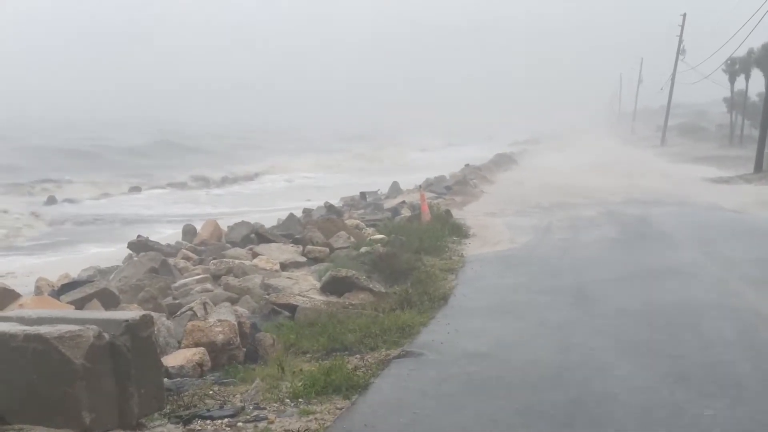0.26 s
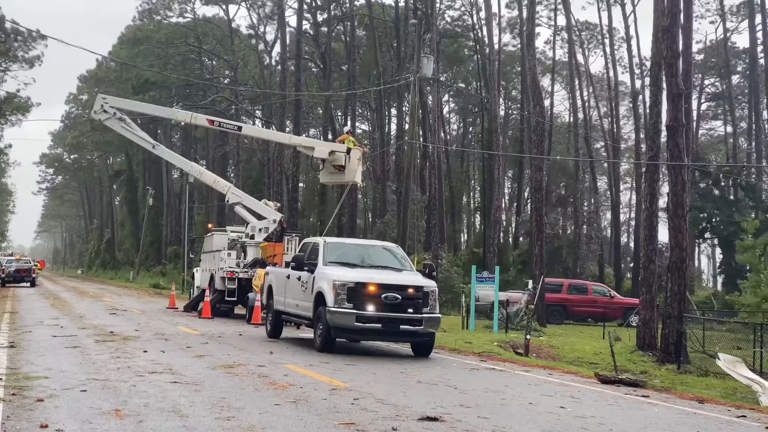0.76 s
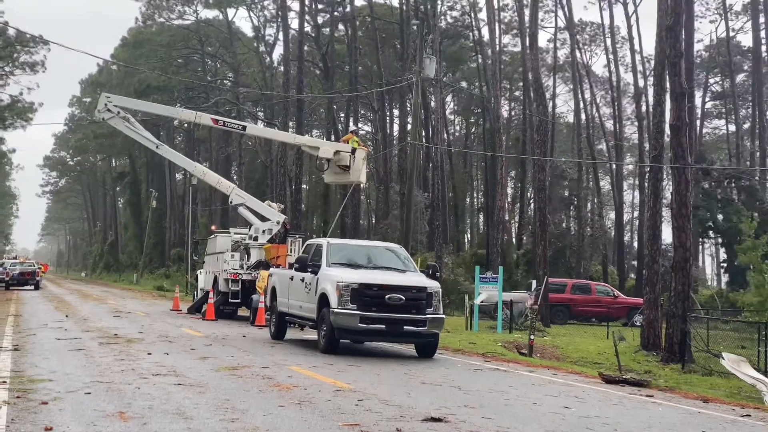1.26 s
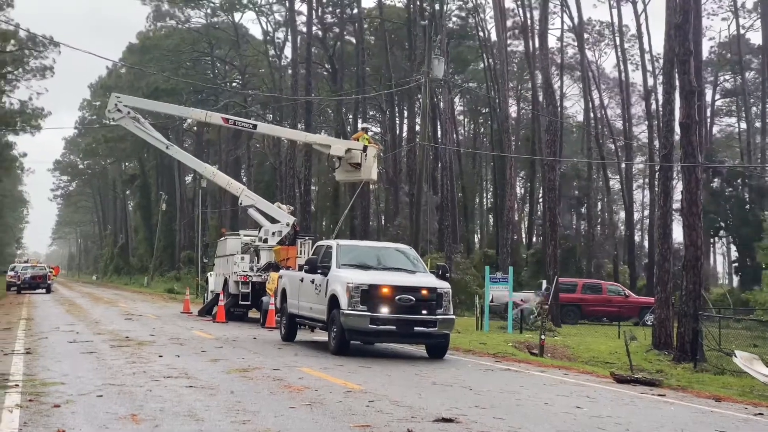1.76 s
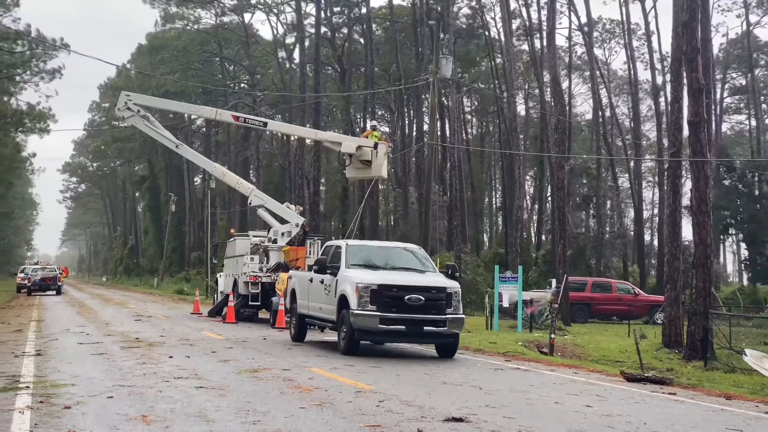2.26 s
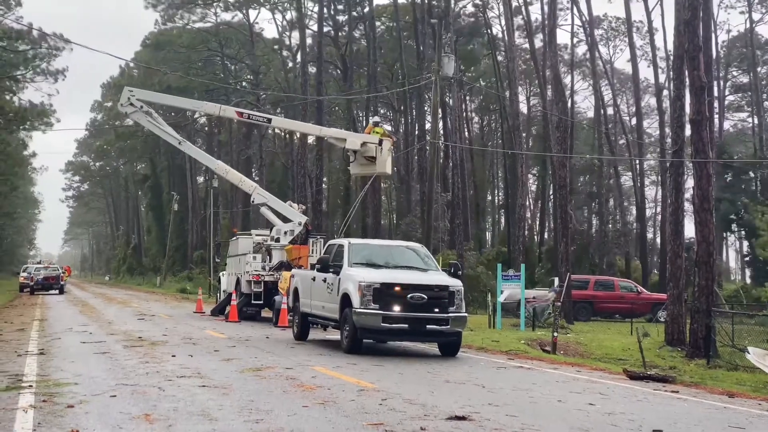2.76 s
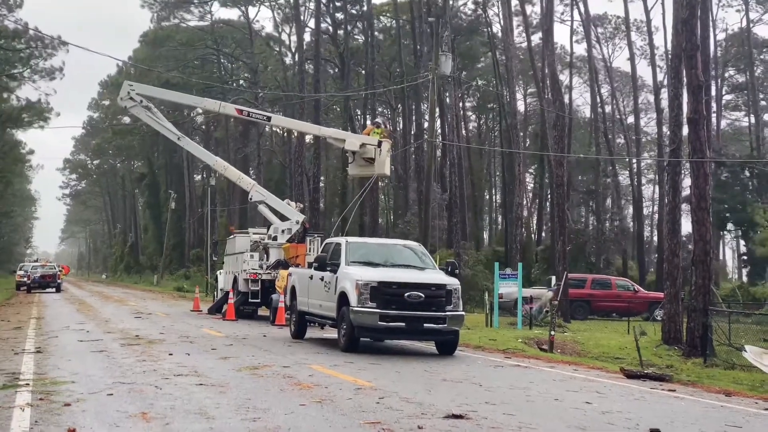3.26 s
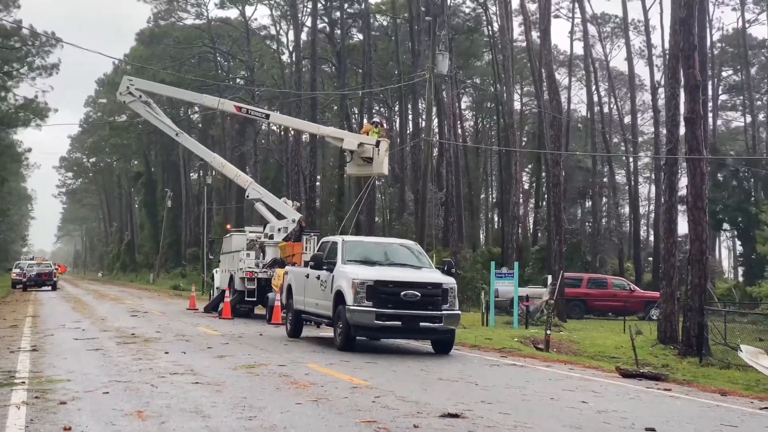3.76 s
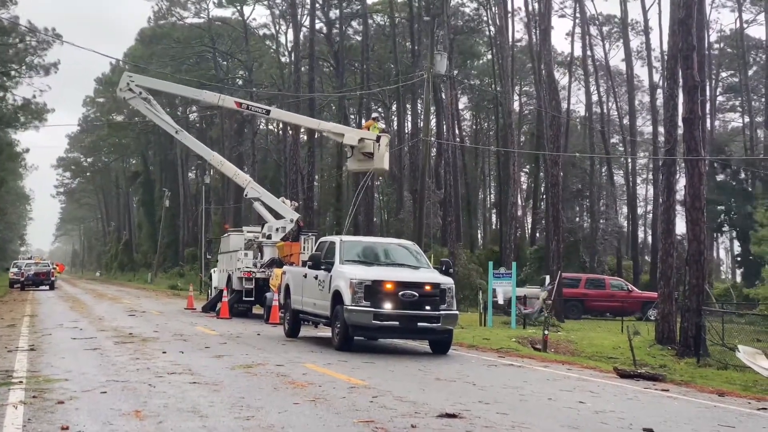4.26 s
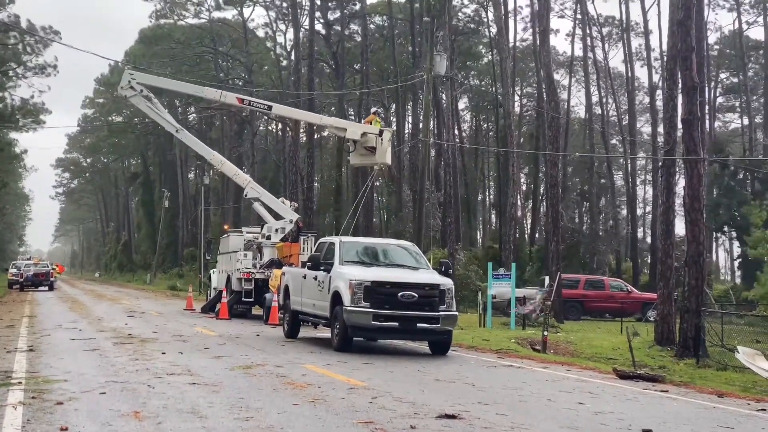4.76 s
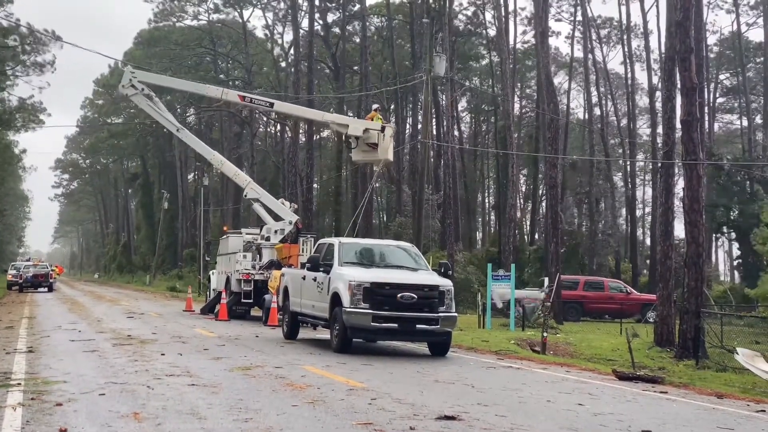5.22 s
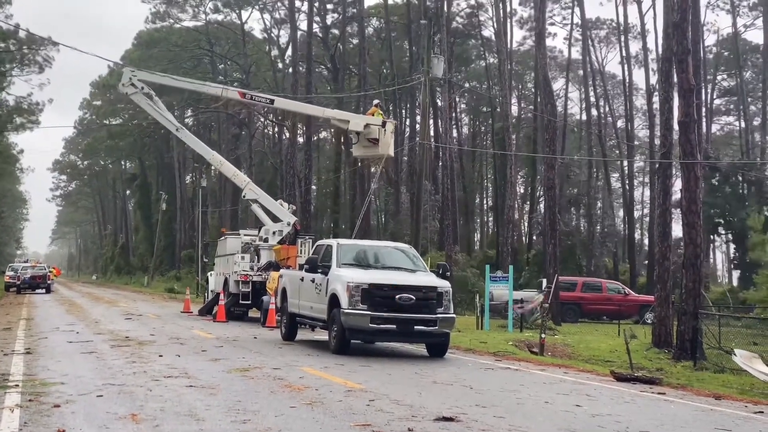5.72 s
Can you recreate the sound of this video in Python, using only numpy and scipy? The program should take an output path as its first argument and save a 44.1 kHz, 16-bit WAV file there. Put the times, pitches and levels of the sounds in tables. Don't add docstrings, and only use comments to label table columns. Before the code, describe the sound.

The sound opens on stormy surf at a rocky shore: a wide, bright hiss over a faint lumpy rumble, with tiny spray slaps and soft far thuds. It fades to silence at about 0.34 seconds and quickly swells back as wind in tall pines. A steady, airy needle hiss lasts to the end, with a mid-range sough gently rising and falling and a lower branch roar. From 0.4 to 1.05 seconds gusts buffet the microphone, with the strongest low, soft thump near 0.83. The wind then stays fairly even, with sparse ticks around 2 to 2.5 seconds. Between 3.3 and 3.9 a faint, fuzzy wire moan swells amid mild buffeting. Dull low knocks come at 4.32 and, more strongly, at 4.5, surrounded by small dry ticks until just after 5 seconds. One last tick falls near 5.37, and plain hiss continues. Open outdoors, close stereo microphone, with thinned bass.

```python
import sys
import numpy as np
from scipy import signal
from scipy.io import wavfile
from scipy.ndimage import uniform_filter1d

SR = 44100
rng = np.random.default_rng(int(sys.argv[2]) if len(sys.argv) > 2 else 0)


def persist_wave(psi):
    counts = np.round(np.clip(psi, -1, 1) * 32767).astype(np.int16)
    wavfile.write(sys.argv[1], SR, np.atleast_2d(counts).T)


def amplitude_ratio(level_db):
    exponent = np.asarray(level_db, float) / 20
    return 10 ** exponent


N = 264047

# frequency in Hz, density in dB per Hz.
SURF_SPECTRUM = [(150, -11), (300, -10), (500, -4), (1000, -7.5), (2000, -3), (4000, -9.5), (6500, -11.5),
                 (9000, -8.5), (12000, -7), (14000, -8), (15600, -2)]
# frequency in Hz, density in dB per Hz.
RUMBLE_SPECTRUM = [(20, -16), (45, -5), (68, -6), (95, -6), (140, -4.5), (250, -7.5), (500, -29)]
# time in seconds, swell in dB.
SWELL = [
    (0.0, 3.5),
    (0.02, 0.5),
    (0.026, 3.5),
    (0.045, 0),
    (0.262, 0.7),
    (0.276, 5.5),
    (0.292, -2),
]
SURF_DB, RUMBLE_DB = -34, -52.5
RUMBLE_FOLLOWS = 2.2
# start in seconds, peak in dB, pitch in Hz, burst length in seconds.
TICKS = [(0.014, -25, 3050, 0.006), (.215, -32, 10000, 0.0015), (0.273, -27.5, 1446, 0.011),
         (0.809, -26, 795, 0.018), (0.666, -29.5, 700, 0.01), (1.992, -25, 1000, .006),
         (2.363, -27, 800, 0.0071), (2.483, -29, 1000, 0.0061), (5.365, -26.5, 1000, .007),
         (0.535, -22.5, 586, 0.0052), (1.923, -23.5, 1000, 0.007), (3.826, -34.5, 800, 0.0047),
         (3.863, -37, 695, 0.0054), (4.195, -30, 1200, 0.0061), (4.436, -28, 1100, 0.01),
         (4.4685, -24, 1100, 0.0028), (4.472, -21.5, 700, 0.012), (2.054, -26.5, 800, 0.007),
         (1.08, -28, 650, .012), (4.499, -23, 900, 0.0083), (4.793, -22, 1380, 0.019),
         (4.823, -25, 1490, 0.0056), (4.938, -23.5, 900, 0.012), (4.958, -24, 1010, 0.0072),
         (5.036, -22.5, 1090, 0.0044)]
# middle in seconds, peak in dB, frequency in Hz, length in seconds.
THUDS = [
    (0.017, -44, 80, 0.042),
    (0.095, -46, 75, .04),
    (0.289, -44, 85, .032),
]

CUT_S, FADE_OUT_S, FADE_IN_S, FADE_BEND = 0.338, 0.058, 0.07, 1.75

# time in seconds, strength in dB.
WIND = [(.42, -38), (.9, -37.5), (1.2, -38), (1.55, -39.5), (1.65, -38), (1.78, -41), (2.15, -36.5),
        (2.35, -39.5), (2.55, -38), (2.9, -40), (3.5, -41), (3.9, -39), (4.25, -41), (4.5, -37.5),
        (5.02, -37), (5.2, -38), (5.7, -40), (5.98, -39)]
CALM_DB = -39.5
# frequency in Hz, density in dB per Hz.
NEEDLE_SPECTRUM = [(1200, -23), (2400, -10), (3000, -5.5), (4000, -8), (6000, -10), (7500, -13), (8300, -6),
                   (10000, -11.5), (12000, -15), (13500, -18.5), (15000, -15.5), (15700, -18)]
# frequency in Hz, density in dB per Hz.
SOUGH_SPECTRUM = [(800, -18.5), (1300, -3.5), (1600, -3.5), (1800, -1.5), (2000, -1.5), (2300, -4.5),
                  (2700, -6.5), (3300, -20)]
# frequency in Hz, density in dB per Hz.
ROAR_SPECTRUM = [(250, -15), (450, -3.5), (600, -1), (740, 0.5), (900, 0), (1100, -1.5), (1400, -14),
                 (2200, -28)]
# frequency in Hz, density in dB per Hz.
BUFFET_SPECTRUM = [(60, -18), (150, -4.5), (280, 1), (450, 0), (700, -9.5), (1300, -38.5)]
NEEDLES_DB, SOUGH_DB, ROAR_DB = -37, -38.5, -42
STILL_DB = -63.5
NEEDLES_FOLLOW, SOUGH_FOLLOWS, ROAR_FOLLOWS = 0.1, 1.04, 0.081
# middle in seconds, buffeting in dB, length in seconds, lift of the branch roar in dB.
EDDIES = [(0.436, -36.5, 0.26, 4.5), (0.674, -49, 0.11, 1.3), (0.755, -38, 0.037, 2.5),
          (0.833, -24, 0.088, 5), (0.962, -34, 0.2, 4), (1.395, -50.5, 0.59, 0.1), (1.66, -56, 0.12, 2.2),
          (1.792, -70, 0.019, -10), (1.812, -46, 0.047, 5), (1.888, -60, 0.027, 9), (1.98, -65, .06, -2),
          (2.15, -61, .25, -2.5), (2.324, -54, 0.042, 1.5), (2.407, -64, 0.038, -4),
          (2.61, -71, 0.066, -6.5), (2.765, -50, 0.28, 0.5), (3.2, -62, 0.45, 1.3), (3.505, -40, 0.28, 0.5),
          (3.815, -38.5, 0.34, .3), (3.965, -57, 0.17, 3), (4.294, -38.5, 0.34, 1.5),
          (4.45, -31, 0.077, -2), (4.508, -36.5, 0.046, -4), (4.58, -60, 0.04, -5),
          (4.659, -40.5, 0.12, -3.5), (4.825, -55, 0.087, 5.5), (4.92, -70, .05, -0.5),
          (4.945, -59, 0.014, 2), (5.12, -70, 0.66, -4), (5.75, -51, 0.086, 2.5)]
EDDY_RISE, EDDY_FALL = 0.51, 0.59
# middle in seconds, peak in dB, frequency in Hz, length in seconds.
LUMPS = [(.418, -30.5, 228, 0.014), (.458, -29, 276, 0.029), (.491, -36, 450, 0.015),
         (.668, -42.5, 206, 0.037), (.752, -30.5, 414, 0.034), (.826, -20, 460, 0.021),
         (.836, -27, 262, .032), (.855, -26, 282, .026), (.884, -25, 295, 0.023), (.917, -44, 426, .016),
         (.96, -26.5, 324, 0.025), (.993, -30, 390, 0.018), (1.036, -28.5, 550, .02),
         (4.445, -25, 428, .0092), (4.448, -24, 428, 0.034)]
LUMP_PAN_DB, LUMP_LAG = -0.5, 0.045
# middle in seconds, peak in dB, frequency in Hz, length in seconds.
KNOCKS = [(1.74, -79, 120, .05), (1.97, -76, 330, .12), (1.822, -55, 200, 0.023), (1.835, -49, 55, 0.042),
          (1.878, -62, 200, 0.024), (1.882, -55, 50, .07), (4.324, -30, 167, 0.034), (4.352, -50, 175, 0.1),
          (4.499, -19, 143, .041), (4.5, -20, 295, 0.024), (4.535, -56, 159, .06), (4.803, -62, 209, 0.029),
          (4.845, -52, 82.5, .04), (4.92, -66, 65, .07), (4.975, -78, 100, .04), (5.06, -83, 70, .07),
          (4.82, -74, 320, 0.074)]
KNOCK_PAN_DB, KNOCK_LAG = 1.1, 0.25
# time in seconds, level in dB.
MOAN = [
    (2.9, -80),
    (3.25, -56),
    (3.4, -45),
    (3.6, -50),
    (3.7, -45),
    (3.87, -40.5),
    (3.95, -62),
    (4.2, -80),
]
MOAN_HZ, MOAN_WIDTH_HZ = 735, 79

# frequency in Hz, lead of the left port in radians, likeness of the ports
PORTS = [(60, 0, .6, 1), (150, .05, .6, 1), (340, .4, .93, .9), (700, 0, .93, .45), (1290, -.6, .87, .3),
         (1700, -.05, .96, .35), (3300, 0, .9, .4), (4200, 0, .8, .8), (7450, -.1, .72, .72),
         (7600, -1.4, .98, .95), (8500, -3.14, .98, .95), (10050, -6.28, .97, .9), (12050, -9.42, .97, .96),
         (13900, -12.57, .97, .9), (15700, -15.7, .97, .9)]
HZ = np.fft.rfftfreq(1024, 1 / SR)
LOOSE_ABOVE_HZ, TIED = 8900, 0.6
# start in seconds, length in seconds, edge in Hz at the start,
# edge in Hz at the end.
OPENINGS = [(0.341, 0.04, 230, 200), (0.388, .178, 108, 107), (.563, 0.1, 200, 188),
            (.658, 0.055, 140, 200), (0.708, 0.096, 258, 246), (0.811, 0.22, 171, 170),
            (1.065, 0.3, 297, 314), (1.325, .32, 246, 224), (1.647, 0.094, 263, 404),
            (1.779, 0.11, 358, 368), (2.046, .077, 120, 122), (2.121, .17, 228, 270),
            (2.293, .47, 318, 354), (2.764, 0.36, 132, 310), (3.036, 0.32, 384, 390),
            (3.273, 0.034, 340, 280), (3.321, 0.24, 189, 165), (3.565, 0.31, 207, 129),
            (3.909, 0.32, 257, 256), (4.25, 0.044, 226, 200), (4.298, 0.2, 317, 348),
            (4.478, 0.23, 240, 284), (4.694, 0.063, 280, 330), (4.86, 0.82, 410, 375),
            (5.718, 0.05, 380, 283), (5.79, 0.11, 282, 258)]
SHUT_HZ = 450
# middle in seconds, length in seconds, depth in dB.
HOLLOWS = [
    (1.97, .14, -5.5),
    (2.46, .2, -5.5),
    (2.215, .06, -3),
    (4.6, .16, -3.5),
    (4.9, .08, -2),
    (5.87, .1, -2.5),
]
HOLLOW_HZ = 700
# frequency in Hz, level against the difference in dB.
DROP_SUM = [(7000, -30), (8600, -14), (11400, -8), (12000, -10.5), (12700, -6.5), (14800, -6),
            (15500, -3.5)]
# frequency in Hz, level against the sum in dB.
DROP_DIFFERENCE = [(1500, -20), (2000, -9), (4000, -4.8), (7200, -3), (7900, -9), (10000, -7), (10700, -6),
                   (13400, -4.5), (14800, -4), (15500, -9)]
BANDS = np.r_[0:1025:16]
WAVER_DB, TOP_HZ = 1.5, 15740


def evened(x):
    return x / np.sqrt(np.mean(abs(x) ** 2) + 1e-20)


def smooth_twice(x, size):
    return uniform_filter1d(uniform_filter1d(x, size=size), size=size)


def read(points, hz):
    f, value = np.transpose(points)
    return np.interp(np.log(hz + 1), np.log(f + 1), value)


def curves(table, t):
    s, *columns = np.transpose(table)
    return [np.interp(t, s, c) for c in columns]


def add(mix, s, sound):
    part = mix[:, max(round(s * SR), 0):][:, :sound.shape[1]]
    part += sound[:, :part.shape[1]]


def air_noise(spectrum, ashore, patchy_db, flicker_db, size=N):
    frames = size // 256 + 5
    *parts, patches = rng.standard_normal((7, len(HZ), frames), np.float32)
    common, separate, loose = (parts[k] + 1j * parts[k + 3] for k in range(3))

    patches = uniform_filter1d(patches, size=10, axis=0)
    patches = evened(uniform_filter1d(patches, size=12, axis=1))
    flicker = evened(uniform_filter1d(rng.standard_normal(frames), size=2))
    level = amplitude_ratio(read(spectrum, HZ)[:, None] + patchy_db * patches + flicker_db * flicker)

    hz, lead, in_pines, on_shore = np.transpose(PORTS)
    half = np.interp(HZ, hz, lead)[:, None] / 2
    same = np.clip(np.interp(HZ, hz, on_shore if ashore else in_pines), 0, 1)[:, None]
    tied = np.where(HZ > LOOSE_ABOVE_HZ, TIED, 1)[:, None]
    shared = np.sqrt((1 + same) / 2)
    own = np.sqrt((1 - same) / 2) * separate
    mid = shared * common * np.cos(half) + 1j * own * np.sin(half)
    partly_tied = tied * common + np.sqrt(1 - tied ** 2) * loose
    side = 1j * shared * partly_tied * np.sin(half) + own * np.cos(half)
    ports = np.array([mid + side, mid - side]) * level
    return evened(signal.istft(ports, nperseg=1024, noverlap=768)[1][:, :size])


def shore(t):
    t = t[t < CUT_S]
    swell_db = curves(SWELL, t)[0]
    surf = air_noise(SURF_SPECTRUM, True, patchy_db=0.0, flicker_db=1.4, size=len(t))
    surf = surf * amplitude_ratio(SURF_DB + swell_db)
    rumble = air_noise(RUMBLE_SPECTRUM, True, patchy_db=2.0, flicker_db=2.5, size=len(t))
    rumble = rumble * amplitude_ratio(RUMBLE_DB + RUMBLE_FOLLOWS * swell_db)
    return np.pad(surf + rumble, ((0, 0), (0, N - len(t))))


def ticks():
    out = np.zeros((2, N))
    for s, db, hz, length in TICKS:
        t = np.arange(1500) / SR
        burst = rng.standard_normal(1500) * t * np.exp(-t / (0.25 * length))
        edges = [hz * 0.61, min(hz * 1.45, SR / 2.2)]
        burst = signal.sosfilt(signal.butter(2, edges, "band", fs=SR, output="sos"), burst)
        add(out, s, np.array([burst, burst]) * amplitude_ratio(db) / abs(burst).max())
    return out


def thumps(table, pan_db, lag):
    out = np.zeros((2, N))
    for s, db, hz, length in table:
        t = np.arange(-length / 2, length / 2, 1 / SR)
        turns = hz * t + np.array([[-lag / 2], [lag / 2]]) + 0.5
        gain = amplitude_ratio(db + np.array([[pan_db / 2], [-pan_db / 2]]))
        add(out, s - length / 2, gain * np.hanning(len(t)) * np.cos(2 * np.pi * turns))
    return out


def fade():
    t = np.arange(N) / SR
    away = np.maximum((CUT_S - t) / FADE_OUT_S, (t - CUT_S) / FADE_IN_S)
    return np.sin(np.pi / 2 * np.clip(away, 0, 1)) ** FADE_BEND


def eddies(t):
    buffet, lift_db = amplitude_ratio(STILL_DB) + 0 * t, 0 * t
    for s, db, length, roar_db in EDDIES:
        spread = length * np.where(t < s, EDDY_RISE, EDDY_FALL)
        bell = np.exp(-((t - s) / spread) ** 2)
        buffet = buffet + amplitude_ratio(db) * bell ** 2
        lift_db = lift_db + roar_db * bell
    return buffet, lift_db


def pines(t):
    wind_db = curves(WIND, t)[0] - CALM_DB
    push, lift_db = eddies(t)
    needles = air_noise(NEEDLE_SPECTRUM, False, patchy_db=1.0, flicker_db=0.5)
    needles = needles * amplitude_ratio(NEEDLES_DB + NEEDLES_FOLLOW * wind_db)
    sough = air_noise(SOUGH_SPECTRUM, False, patchy_db=1.02, flicker_db=0.7)
    sough = sough * amplitude_ratio(SOUGH_DB + SOUGH_FOLLOWS * wind_db)
    roar = air_noise(ROAR_SPECTRUM, False, patchy_db=0.76, flicker_db=1.05)
    roar = roar * amplitude_ratio(ROAR_DB + ROAR_FOLLOWS * wind_db + lift_db)
    buffet = push * air_noise(BUFFET_SPECTRUM, False, patchy_db=2.2, flicker_db=1.5)
    flutter = amplitude_ratio(1.8 * evened(smooth_twice(rng.standard_normal(N), 250)))
    return needles + sough + flutter * (roar + buffet)


def filter_edge(t):
    edge_hz = SHUT_HZ + 0 * t
    for s, length, start_hz, end_hz in OPENINGS:
        done = (t - s) / length
        is_open = (done >= 0) & (done < 1.03)
        edge_hz = np.where(is_open, start_hz + (end_hz - start_hz) * done, edge_hz)
    return edge_hz


def wind_filter(x, slope_db_per_hz=0.8, lift_hz=46.3, ragged_hz=15.0, leak_db=-47.5, shelf_db=-2.5):
    hz, t, z = signal.stft(x, SR, nperseg=2048, noverlap=1536)
    hz = hz[:, None]
    wobble, seep = evened(uniform_filter1d(rng.standard_normal((2, len(t))), size=3))
    edge_hz = np.where(t > CUT_S, filter_edge(t) + lift_hz + ragged_hz * wobble, -100)
    floor_db = np.minimum(leak_db + 7 * seep, -20)
    cut_db = np.clip(slope_db_per_hz * (hz - edge_hz), floor_db, 0)
    cut_db += shelf_db * (hz < 1.6 * edge_hz)
    hollow_db = sum(db * (abs(t - s) < length / 2) for s, length, db in HOLLOWS)
    cut_db += (hz < HOLLOW_HZ) * hollow_db
    return signal.istft(z * amplitude_ratio(cut_db), SR, nperseg=2048, noverlap=1536)[1][:, :N]


def moan(t):
    edges = [MOAN_HZ - MOAN_WIDTH_HZ / 2, MOAN_HZ + MOAN_WIDTH_HZ / 2]
    band = signal.butter(2, edges, "band", fs=SR, output="sos")
    return amplitude_ratio(curves(MOAN, t)[0]) * evened(signal.sosfilt(band, rng.standard_normal(N)))


def scene():
    t = np.arange(N) / SR
    air = shore(t) + ticks() + pines(t) * (t > CUT_S) + moan(t)
    blows = thumps(THUDS, 0, 0)
    blows += thumps(LUMPS, LUMP_PAN_DB, LUMP_LAG)
    blows += thumps(KNOCKS, KNOCK_PAN_DB, KNOCK_LAG)
    return wind_filter(air) + blows


def roll_off(x):
    return signal.sosfilt(signal.butter(12, 16100, fs=SR, output="sos"), x)


def record(dry):
    pair = np.array([dry[0] + dry[1], dry[0] - dry[1]]) / 2
    hz, t, z = signal.stft(pair, SR, nperseg=2048, noverlap=1024)
    power_db = 10 * np.log10(np.add.reduceat(abs(z) ** 2, BANDS, axis=1) + 1e-20)
    width = np.diff(BANDS, append=len(hz))
    middle_hz = hz[BANDS] + width * hz[1] / 2
    limit_db = np.array([read(DROP_SUM, middle_hz), read(DROP_DIFFERENCE, middle_hz)])[..., None]
    waver = evened(uniform_filter1d(rng.standard_normal(power_db.shape), size=3))
    strong = power_db - power_db[::-1] > limit_db + WAVER_DB * waver
    keep = np.repeat(strong, width, axis=1) & (hz < TOP_HZ)[:, None]
    kept = signal.istft(z * keep, SR, nperseg=2048, noverlap=1024)[1][:, :N]
    mid, side = kept * fade()
    return roll_off(np.array([mid + side, mid - side]))


dry = scene()
out = record(dry)
persist_wave(out)
```